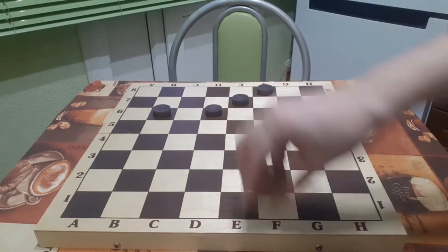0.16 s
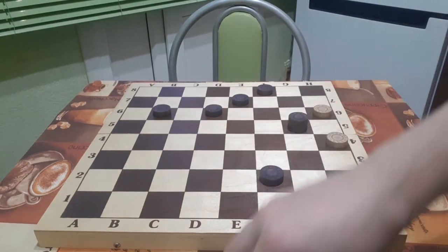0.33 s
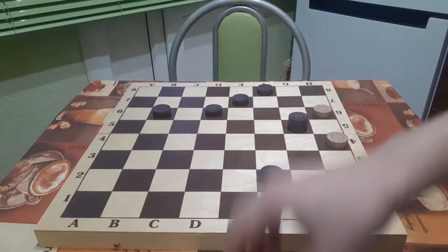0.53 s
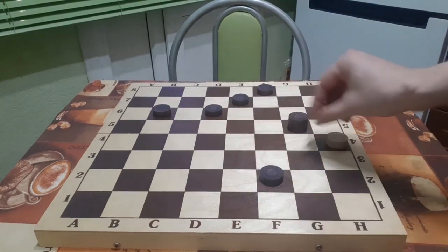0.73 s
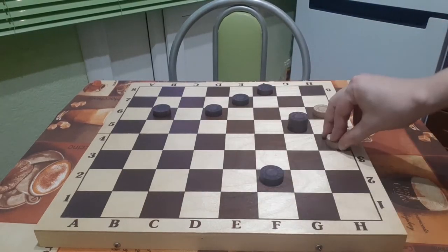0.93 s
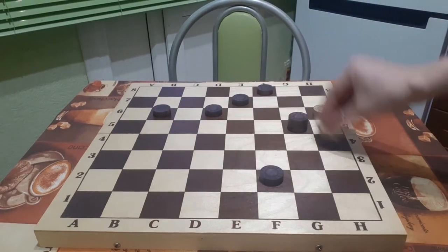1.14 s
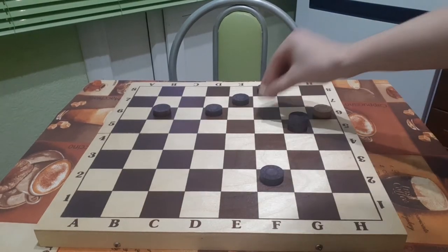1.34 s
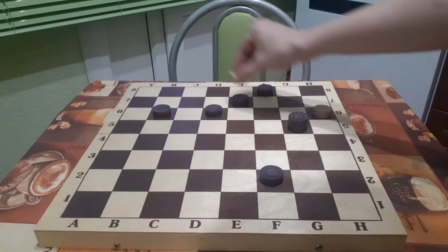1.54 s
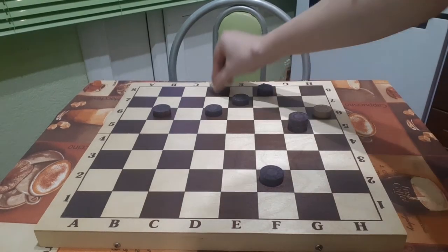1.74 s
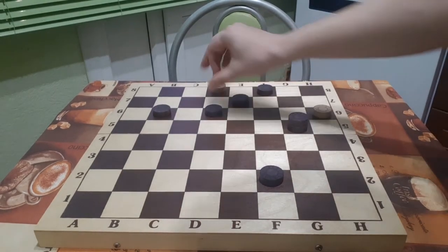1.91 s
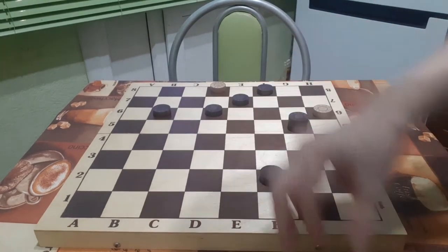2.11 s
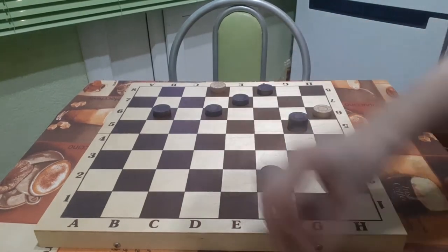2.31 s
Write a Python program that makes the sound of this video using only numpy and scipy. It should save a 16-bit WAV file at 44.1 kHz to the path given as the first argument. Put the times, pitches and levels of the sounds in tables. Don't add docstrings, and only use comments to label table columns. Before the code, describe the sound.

Wooden draughts pieces click on a hollow board, with two loud sharp cracks in a small kitchen.

```python
import sys
import numpy as np
from scipy import signal
from scipy.fft import rfft, irfft, next_fast_len
from scipy.io import wavfile
from scipy.ndimage import uniform_filter1d

SR = 44100
rng = np.random.default_rng(int(sys.argv[2]) if len(sys.argv) > 2 else 0)


def invert_db(x):
    u = np.asarray(x, float) / 20
    return 10 ** u


def to_wav(sig):
    pcm = np.clip(np.atleast_2d(sig), -1, 1) * 32767
    pcm = np.round(pcm).astype(np.int16)
    wavfile.write(sys.argv[1], SR, pcm.T)


N = 108486


def unit(x):
    return x / np.sqrt(np.mean(x ** 2) + 1e-20)


def along(points, hz):
    f, v = np.transpose(points)
    return np.interp(np.log(hz + 1), np.log(f + 1), v)


def filtered(x, response):
    m = next_fast_len(x.shape[-1] + 8192)
    spectrum = rfft(x, m) * response(np.fft.rfftfreq(m, 1 / SR))
    return irfft(spectrum, m)[..., :x.shape[-1]]


def causal(tone, size=2048):
    level = invert_db(along(tone, np.fft.rfftfreq(size, 1 / SR)))
    cepstrum = irfft(np.log(level + 1e-4), size)
    fold = np.r_[1, 2 * np.ones(size // 2 - 1), 1, np.zeros(size // 2 - 1)]
    impulse = irfft(np.exp(rfft(cepstrum * fold)), size)[:size // 2]
    return impulse / np.linalg.norm(impulse)


# (frequency [Hz], left-right correlation [-1..1])
LIKENESS = [(40, 0.74), (100, 0.81), (200, 0.78), (400, 0.94), (800, 0.063), (1500, 0.011), (16000, 0.0067)]


def paired(pair):
    def mid_side_gains(hz):
        angle = np.arccos(np.clip(along(LIKENESS, hz), -1, 1)) / 2
        return np.array([np.cos(angle), np.sin(angle)])
    mid, side = filtered(pair, mid_side_gains)
    return np.array([mid + side, mid - side])


# (frequency [Hz], density [dB per Hz])
AIR = [(15, -53.5), (25, -19), (149, -7), (263, -9), (301, 1), (335, -25.5), (373, -12.5), (659, -30),
       (16000, -35.5)]
AIR_DB = -64.5
# (centre [Hz], width [Hz], level [dB])
DRONE = [(99, 3.4, -75.5), (150, 22, -70), (196, 75, -85.5), (311, 15, -70), (455, 22, -83.5),
         (750, 71, -79.5), (1750, 30, -88.5)]
# (frequency [Hz], level [dB])
HUM = [(99.5, -68.5), (156, -64.5)]
# (time [s], gain [dB])
SWELL = [(0, -3), (.6, -1.5), (1, -1.5), (1.4, -1), (1.8, -3.5), (2.1, -6.5), (2.46, -5.5)]


def background():
    t = np.arange(N) / SR
    air = paired(rng.standard_normal((2, N)))
    out = invert_db(AIR_DB) * unit(filtered(air, lambda hz: invert_db(along(AIR, hz))))
    for centre_hz, width_hz, db in DRONE:
        noise = paired(rng.standard_normal((2, N)))
        band = filtered(noise, lambda hz: 1 / (1 + ((hz - centre_hz) / width_hz * 2) ** 2))
        out = out + invert_db(db) * unit(band)
    for hz, db in HUM:
        out = out + invert_db(db) * np.sqrt(2) * np.sin(2 * np.pi * hz * t)
    return invert_db(np.interp(t, *np.transpose(SWELL))) * out


# (frequency [Hz], t60 [s])
ROOM_T60 = [(300, 0.42), (1000, 0.28), (2000, 0.33), (3000, 0.32), (3800, 0.3), (4900, 0.32), (9000, 0.27),
            (15000, 0.28)]
# (frequency [Hz], level [dB])
ROOM_TONE = [(500, 1), (2000, -3), (8000, -0.5), (10000, -1), (16000, -3)]
PATCHY_DB, ROOM_RISE_S = 3, 0.0049
SPIKY_DB, SPIKY_T60_S = 3.5, .2
EARLY_DB, EARLY_T60_S = -1, 0.018


def kitchen():
    size = SR * 3 // 8
    hz, t, z = signal.stft(rng.standard_normal((2, size)), SR, nperseg=256)
    patches = uniform_filter1d(rng.standard_normal(z.shape[1:]), size=3, axis=0)
    patches = unit(uniform_filter1d(patches, size=24, axis=1))
    decay_db = along(ROOM_TONE, hz)[:, None] - 60 * t / along(ROOM_T60, hz)[:, None]
    tail = signal.istft(z * invert_db(PATCHY_DB * patches + decay_db), SR, nperseg=256)[1][:, :size]

    t = np.arange(size) / SR
    spikes = unit(uniform_filter1d(rng.standard_normal(size), size=40))
    echoes = invert_db(SPIKY_DB * invert_db(-60 * t / SPIKY_T60_S) * spikes)
    rise = 1 - np.exp(-t / ROOM_RISE_S)
    early = 1 + invert_db(EARLY_DB - 60 * t / EARLY_T60_S)
    tail = paired(tail) * echoes * rise * early
    return tail / np.linalg.norm(tail[0])


# (frequency [Hz], left over right [dB])
LEAN = [(150, -3.2), (330, 4), (600, -3.5), (1200, -3.2)]
BOOM_RISE_S, LONGEST_T60_S = .005, .6
BEAT_DB, FLUTTER = 6, .35
SPACING_S = 0.00023
PUSH_DB, PUSH_S = 4, 0.00054


def board_boom(modes, t):
    side = np.array([[1], [-1]])
    skew = rng.normal(0, 1, len(modes))
    wander = np.cumsum(rng.standard_normal((len(modes), len(t))), 1)
    drift_rad = FLUTTER * uniform_filter1d(wander, size=400) / np.sqrt(SR / 20)
    boom = np.zeros((2, len(t)))
    for (hz, db, t60), k, drift in zip(modes, skew, drift_rad):
        beat_db = BEAT_DB * np.sin(hz / 4 * t + 2 * k) * (hz > 220)
        decay_db = -60 * t / min(t60, LONGEST_T60_S)
        level_db = db + along(LEAN, hz) / 2 * side + beat_db + decay_db
        delayed_s = t + SPACING_S / 2 * k * side
        boom += invert_db(level_db) * np.sin(2 * np.pi * hz * delayed_s + drift)
    push = (t / PUSH_S) * (2 - t / PUSH_S) * np.exp(-t / PUSH_S)
    return boom * (1 - np.exp(-t / BOOM_RISE_S)) + invert_db(PUSH_DB) * push


LEAD = SR // 10
CRACK_T60_S = 0.0072
RING_DB, RING_T60_S = -2, 0.011
ROOM_RING_DB, ROOM_RING_T60_S = -15, .003


def move(contacts, tone, modes, room_db):
    out = np.zeros((2, N + SR))
    t = np.arange(SR // 2) / SR
    colour = causal(tone)[None]
    boom = board_boom(modes, t)
    for s, crack_db, boom_db, ring_hz in contacts:
        noise = rng.standard_normal((2, len(t))) * invert_db(-60 * t / CRACK_T60_S)
        phase = rng.random((2, 1)) / 4
        ring = invert_db(RING_DB - 60 * t / RING_T60_S) * np.sin(2 * np.pi * (ring_hz * t + phase))
        crack = signal.fftconvolve(noise, colour, axes=1)[:, :len(t)] + ring

        room_ring = unit(invert_db(-60 * t / ROOM_RING_T60_S) * np.sin(2 * np.pi * ring_hz * t))[:1024]
        sent = colour + invert_db(ROOM_RING_DB) * room_ring / np.sqrt(len(t))
        wet = signal.fftconvolve(kitchen(), sent, axes=1)
        wet = np.pad(wet, ((0, 0), (0, len(t))))[:, :len(t)]
        wet = wet * np.linalg.norm(crack) / np.sqrt(2)

        at = round(s * SR) + LEAD
        out[:, at:at + len(t)] += invert_db(crack_db) * (crack + invert_db(room_db) * wet) + invert_db(boom_db) * boom
    return out[:, LEAD:LEAD + N]


# (time [s], crack [dB], boom [dB], ring [Hz])
EARLIER = [
    (0.0011, -40, -43, 3260),
]
# (frequency [Hz], density [dB per Hz])
EARLIER_TONE = [(180, -19), (300, -25), (379, -25.5), (725, -19), (946, -27.5), (3130, -29), (16000, -48.5)]
# (frequency [Hz], level [dB], t60 [s])
EARLIER_BOOM = [(190, -4, 0.11), (308.6, -12, 0.28), (665, 1, 0.077), (743, -5, 0.16), (788, -9, 0.18)]
# (time [s], crack [dB], boom [dB], ring [Hz])
PUT_ASIDE = [
    (.421, -49, -59, 4500),
    (.4272, -45, -47, 8000),
    (.4305, -27, -39, 10230),
    (.4332, -34, -55.5, 5300),
    (.4365, -27, -42, 3000),
    (.4392, -26, -46, 4400),
]
# (frequency [Hz], density [dB per Hz])
PUT_ASIDE_TONE = [(150, -5), (300, -12.5), (1600, -10.5), (3000, -2), (5500, -1.5), (8000, -9.5),
                  (12500, -8), (13100, -63)]
# (frequency [Hz], level [dB], t60 [s])
PUT_ASIDE_BOOM = [(138.3, 4, 0.27), (189.4, 2.5, 0.21), (318, -2.5, 0.099), (650, -34, 0.16)]
# (time [s], crack [dB], boom [dB], ring [Hz])
LIFT = [
    (.8845, -53.5, -48.5, 1500),
    (.8882, -51, -86, 6340),
]
# (frequency [Hz], density [dB per Hz])
LIFT_TONE = [(120, -16), (250, 10), (700, 0), (1500, -6), (2400, -22), (5000, -13.5), (6500, -16),
             (16000, -40)]
# (frequency [Hz], level [dB], t60 [s])
LIFT_BOOM = [(204, 2, 0.26), (239, 7.5, 0.15), (316.7, -3, 0.42), (465, -9, 0.23), (660, -6.5, 0.19),
             (1055, -15, 0.27), (1500, -20, 0.23)]
# (time [s], crack [dB], boom [dB], ring [Hz])
SLIDE = [
    (1.072, -57.5, -88, 7100),
    (1.08, -55.5, -63.5, 5300),
    (1.088, -59.5, -69, 7350),
    (1.097, -64.5, -88, 4800),
]
# (frequency [Hz], density [dB per Hz])
SLIDE_TONE = [(290, -43.5), (500, -12), (659, -8), (2290, -11), (3020, -17.5), (3390, -11.5), (4870, -9.5),
              (16000, -30)]
# (frequency [Hz], level [dB], t60 [s])
SLIDE_BOOM = [(683, -2, 0.19), (813, 2, 0.091), (1160, -9, 0.22), (1500, -2, 0.18)]
# (time [s], crack [dB], boom [dB], ring [Hz])
JUMP = [
    (1.3992, -11, -27, 3000),
    (1.4002, -7, -64.5, 6900),
    (1.4035, -10, -65.5, 4000),
    (1.4052, -10, -54.5, 3400),
    (1.4202, -17, -60, 4500),
]
# (frequency [Hz], density [dB per Hz])
JUMP_TONE = [(150, -31.5), (550, -19), (850, -21.5), (2000, -10), (3000, -5), (5300, -6), (8600, -12),
             (9500, -14.5), (15500, -21.5)]
# (frequency [Hz], level [dB], t60 [s])
JUMP_BOOM = [(135, -4.5, 0.38), (194.5, 4, 0.28), (285, -7.5, .15), (332, -5, 0.14), (399, -7.5, 0.35),
             (545, -6, 0.14), (640, -17.5, 0.36), (665, -8, 0.36), (715, -13, 0.067), (997, -18, .3),
             (1125, -11.5, 0.33), (1220, -19, 0.48)]
# (time [s], crack [dB], boom [dB], ring [Hz])
LAND = [
    (1.780, -10, -25, 6900),
    (1.782, -6, -60, 4200),
    (1.7857, -10, -60, 6900),
    (1.7955, -15, -60, 6900),
    (1.8035, -14, -60, 5300),
]
# (frequency [Hz], density [dB per Hz])
LAND_TONE = [(200, -26.5), (500, -27), (1150, -11), (2000, -14), (4200, -6.5), (6900, -10.5), (10000, -19),
             (16000, -21)]
# (frequency [Hz], level [dB], t60 [s])
LAND_BOOM = [(204.8, -16, 0.42), (255, -4, 0.062), (282.4, 2.5, 0.18), (309.4, -3.5, 0.15), (341.6, 5, .17),
             (401, -6, 0.33), (574, -9, .17), (672, -5, 0.27), (976, -13.5, 0.22), (1024, -13.5, 0.53),
             (1165, -14, .2), (1168, -5.5, 0.27), (1241, 1.5, 0.12), (1370, -8.5, .2)]
# (time [s], crack [dB], boom [dB], ring [Hz])
SET_DOWN = [
    (2.2235, -58, -44, 3000),
    (2.2315, -52.5, -61, 4340),
    (2.236, -57.5, -74, 3370),
]
# (frequency [Hz], density [dB per Hz])
SET_DOWN_TONE = [(100, -14), (200, 4), (800, 3.5), (1520, -11), (2600, -8), (4240, -4), (8030, -24),
                 (16000, -43)]
# (frequency [Hz], level [dB], t60 [s])
SET_DOWN_BOOM = [(130.5, 4, 0.29), (200, 3, 0.21), (338, -13, 0.27), (398, -22, 0.16), (527, -24, .15),
                 (620, -17, 0.13), (690, -7.5, 0.15), (795, -27, 0.24)]
MOVES = [(EARLIER, EARLIER_TONE, EARLIER_BOOM), (PUT_ASIDE, PUT_ASIDE_TONE, PUT_ASIDE_BOOM),
         (LIFT, LIFT_TONE, LIFT_BOOM), (SLIDE, SLIDE_TONE, SLIDE_BOOM), (JUMP, JUMP_TONE, JUMP_BOOM),
         (LAND, LAND_TONE, LAND_BOOM), (SET_DOWN, SET_DOWN_TONE, SET_DOWN_BOOM)]
ROOM_DB = [7, 2, 10, 9.2, 6, 4, 9.5]
LOW_CUT_HZ = 110


def game():
    moves = sum(move(*parts, room_db) for parts, room_db in zip(MOVES, ROOM_DB))
    return filtered(moves, lambda hz: (1j * hz / (LOW_CUT_HZ / 2 + 1j * hz)) ** 4)


def scene():
    return background() + game()


BUSY_DB, STARVED_HZ, STARVED_SHARE = -50, 8800, .33


def starved(x):
    hz, t, z = signal.stft(x, SR, nperseg=2048)
    hz = hz[:, None]
    level_db = 10 * np.log10(np.sum(np.abs(z[0]) ** 2 * (hz > 2000), axis=0) + 1e-12)
    busy = (level_db > BUSY_DB) & (np.roll(level_db, 2) > BUSY_DB)
    luck = rng.random((len(hz) // 16 + 1, len(t) // 2 + 1))
    luck = np.repeat(np.repeat(luck, 16, axis=0), 2, axis=1)[:len(hz), :len(t)]
    lost = busy & (luck < STARVED_SHARE * hz / 12000) & (hz > STARVED_HZ)
    return x - signal.istft(z * lost, SR, nperseg=2048)[1][:, :N]


def top_cut(x):
    return signal.sosfilt(signal.butter(12, 17020, fs=SR, output="sos"), x)


CEILING, TOP_HZ, SKIRT_HZ = .95, 15780, 30
OPEN_TOP_DB, OPEN_TOP_HZ, OPEN_SKIRT_HZ = -15, 16400, 80


def record(dry):
    def low_pass(x, top_hz, skirt_hz):
        return filtered(x, lambda hz: invert_db(-6 * np.logaddexp(0, (hz - top_hz) / skirt_hz)))
    held = dry / (1 + np.abs(dry / CEILING) ** 6) ** (1 / 6)
    body = low_pass(held, TOP_HZ, SKIRT_HZ)
    loudest = uniform_filter1d(np.mean(held ** 2, axis=0), size=300) > invert_db(OPEN_TOP_DB) ** 2
    opening = uniform_filter1d(1.0 * loudest, size=200)
    top = low_pass((held - body) * opening, OPEN_TOP_HZ, OPEN_SKIRT_HZ)
    return top_cut(starved(body) + top)


dry = scene()
out = record(dry)
to_wav(out)
```